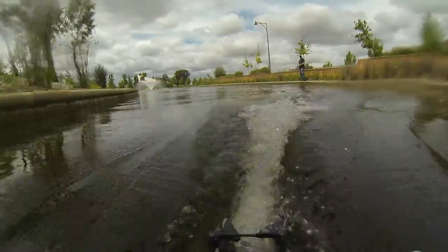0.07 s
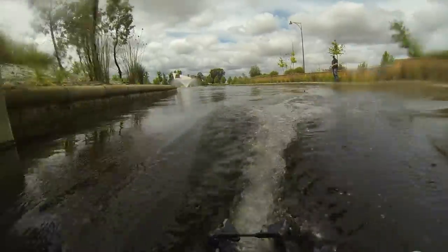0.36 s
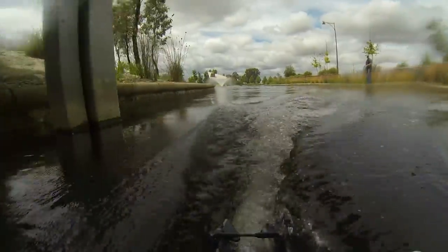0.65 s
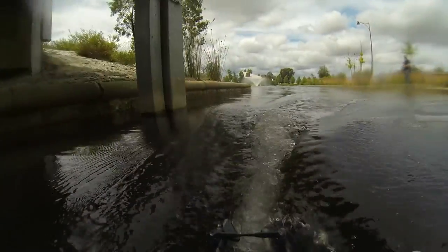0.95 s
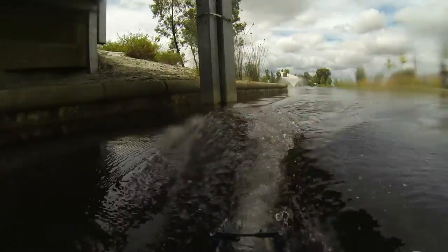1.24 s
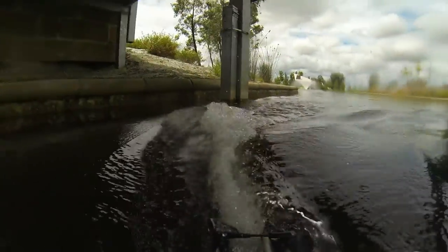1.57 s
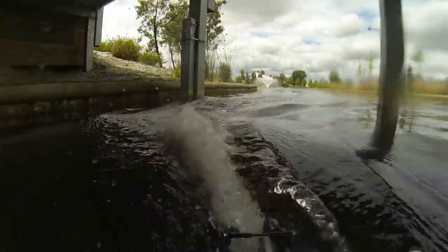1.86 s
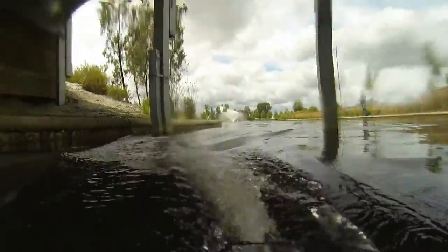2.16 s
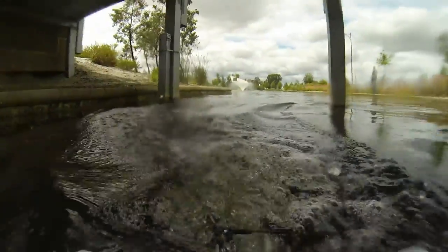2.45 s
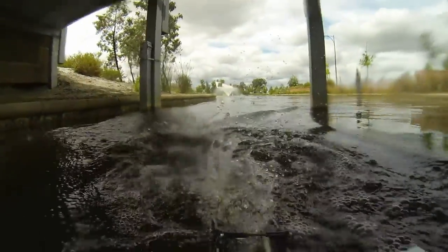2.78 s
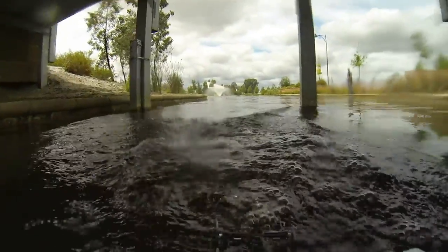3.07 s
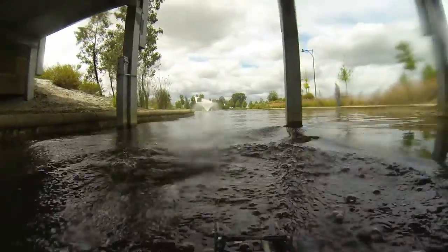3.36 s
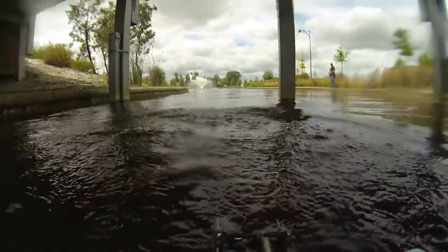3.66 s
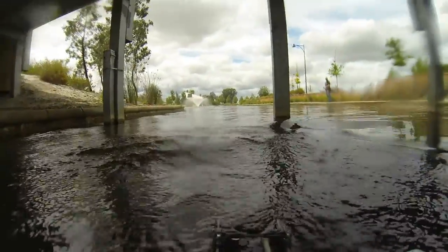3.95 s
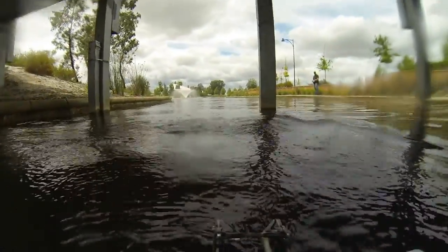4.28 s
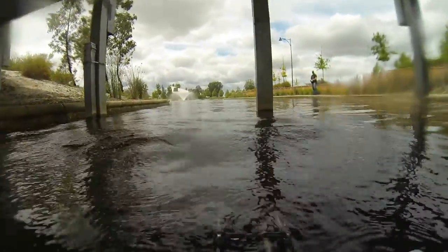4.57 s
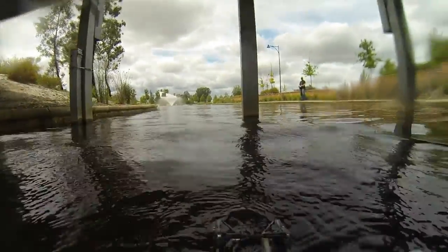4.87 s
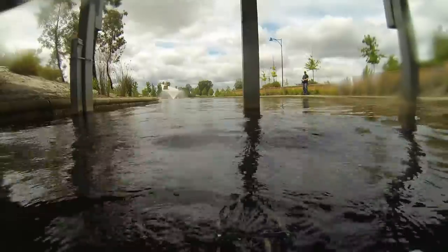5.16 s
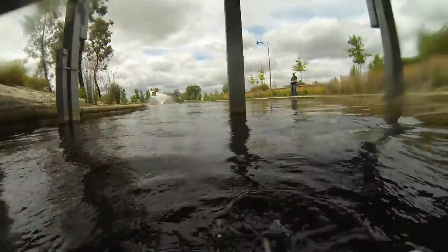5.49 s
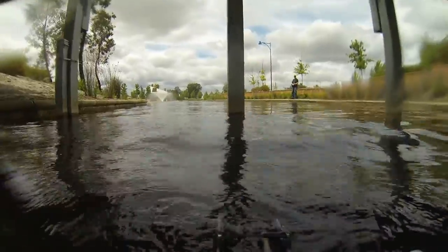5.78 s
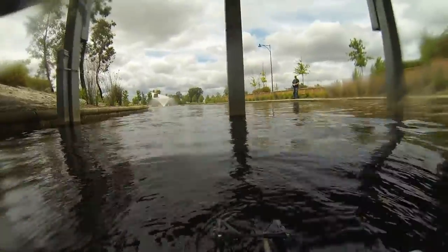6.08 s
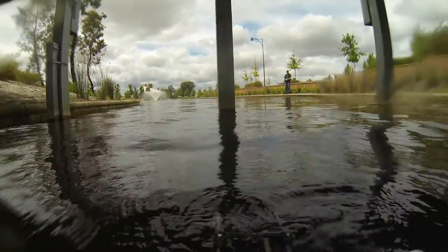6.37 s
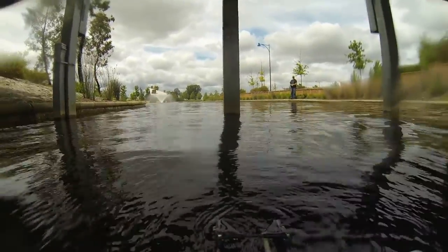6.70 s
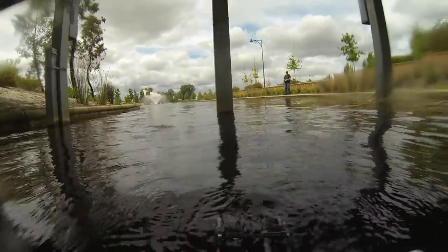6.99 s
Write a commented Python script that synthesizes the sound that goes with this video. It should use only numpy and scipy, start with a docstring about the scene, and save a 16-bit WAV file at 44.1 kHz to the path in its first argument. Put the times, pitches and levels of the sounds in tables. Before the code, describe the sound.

From the start, a model boat's electric motor buzzes loudly at full throttle, right by a microphone on deck. The low drone wavers slightly, carrying a whine, a thin high whistle and boxy, churning water. At about 2.1 seconds the motor cuts off with a sharp thump and a low rumble. From 2.3 to 2.9 seconds it gives one weaker burst and runs down, while the foaming wake sloshes against the stern with a light patter of spray. The foam thins into faint fizzing after 3 seconds. A dull knock bumps the hull at 3.4 seconds, with a softer one just after. The rest is much quieter: the boat drifts under a soft wash of outdoor air while scattered drops tap the deck. A brighter drip and slap come around 4.4 seconds, and small hollow laps follow near 5.8, 6.5 and 7.1 seconds.

```python
"""A model boat's buzz at full throttle, right at the microphone of a camera housed on its deck.
The propeller shakes the hull and churns the water while the speed controller whistles.
The motor brakes with a jolt and gives one short weak burst; the wake falls back and bumps the
hull. Then the boat drifts: ripples lap just below the microphone, and drops land on deck and
housing over a soft wash of air and distant water."""
import sys
import numpy as np
from scipy import signal
from scipy.fft import rfft, irfft
from scipy.io import wavfile
from scipy.ndimage import uniform_filter1d

SR = 44100
rng = np.random.default_rng(int(sys.argv[2]) if len(sys.argv) > 2 else 0)


def wav_out(sig):
    """Save sig, one row per channel (or a flat mono array), as 16-bit PCM at SR to the path in sys.argv[1]."""
    wavfile.write(sys.argv[1], SR, np.round(np.clip(np.atleast_2d(sig).T, -1, 1) * 32767).astype(np.int16))


N = 314609
TIME = np.arange(N) / SR
CUT_S, BRAKE_S = 2.132, 0.029  # when the power goes off; how long the propeller takes to stop


def amp(db):
    return 10 ** (np.asarray(db) / 20)


def unit(x):
    return x / np.sqrt(np.mean(x ** 2) + 1e-30)


def curve(rows):
    """The columns of a table as lines through time."""
    s, *columns = np.transpose(rows)
    return [np.interp(TIME, s, c) for c in columns]


def ramp(start_s, length_s):
    return np.clip((TIME - start_s) / length_s, 0, 1)


def fall_db(start_s, db_per_s):
    return np.clip((TIME - start_s) * db_per_s, 0, 150)


def add(mix, s, sound):
    part = mix[max(round(s * SR), 0):][:len(sound)]
    part += sound[:len(part)]


def band(x, lo_hz, hi_hz, order=2):
    return signal.sosfilt(signal.butter(order, [lo_hz, hi_hz], "band", fs=SR, output="sos"), x)


def wander(rate_hz):
    """Random drift of unit size, mostly slower than rate_hz."""
    rolloff = 1 + (np.fft.rfftfreq(N, 1 / SR) / rate_hz) ** 4
    return unit(irfft(rfft(rng.standard_normal(N)) / rolloff, N))


def response(colour, modes=()):
    """Causal impulse response of a smooth spectrum shaped by resonances."""
    hz = abs(np.fft.fftfreq(8192, 1 / SR))
    f, level = np.transpose(colour)
    db = np.interp(np.log(hz + 1), np.log(f), level)
    for centre, width, lift in modes:
        db = db + lift * .5 ** ((2 * (hz - centre) / width) ** 2)
    minimum_phase = np.exp(np.conj(signal.hilbert(np.log(amp(db)))))
    return np.fft.ifft(minimum_phase).real[:len(hz) // 2]


def through(x, taps):
    return signal.oaconvolve(x, taps)[:len(x)]


def pops(per_s, spread_db):
    """Bursting bubbles: random clicks, a few much larger than the rest."""
    size = amp(spread_db * np.minimum(rng.exponential(1, N), 4))
    return unit(size * rng.choice([-1, 1], N) * (rng.random(N) < per_s / SR))


# Resonances of the hull and of the housing around the microphone: (f/Hz, width/Hz, lift/dB)
BODY_MODES = [(202.8, 13, 9.5), (249.8, 31.7, 9.5), (288, 37.6, 11), (554, 49, 2.5), (845, 90, 3.5),
              (1316, 294, 10.5), (1560, 100, 4.5), (1947, 96, 5), (2350, 450, 4), (3157, 272, 11.5),
              (3450, 310, 13), (3826, 170, 6.5), (4380, 130, -11), (4380, 170, 7), (4925, 350, 13),
              (5390, 490, 11.5), (5880, 360, 11.5), (6660, 290, 12.5), (10700, 1100, 6.5)]
# Shaft speed at full throttle: (t/s, f/Hz)
SHAFT_SPEED = [(0.0, 126.6), (0.09, 125.8), (0.53, 126.1), (0.72, 130.4), (1.29, 130.1), (1.39, 126),
               (1.81, 127.1), (2.06, 129.7), (2.13, 134.8)]
# Beat of the blades, carried up through the hull: (t/s, relative level/dB)
BLADE_BEAT = [(0, -14.5), (.08, -12.5), (.2, -16), (.32, -23), (.42, -14.5), (.49, -13), (.57, -20.5),
              (.66, -13.5), (.77, -20), (.9, -12.5), (1.22, -20.5), (1.32, -13), (1.45, -23.5), (1.65, -20),
              (1.77, -15), (1.96, -15.5), (2.05, -14), (2.13, -13)]
# Whine of the motor's poles: {multiple of the shaft speed: level/dB}
POLE_WHINE = {4: -43, 6: -43, 9: -42, 10: -37.5, 12: -37, 15: -46, 24: -51, 30: -58}
# Churned water heard from the deck, before the resonances: (f/Hz, relative level/dB)
CHURN_SPECTRUM = [(25, -22), (75, -21), (110, -10.5), (160, -1), (250, 2), (400, -5), (750, -4.5),
                  (1000, -8), (1750, -11), (2750, -22), (4300, -30.5), (6700, -52.5), (7800, -32.5),
                  (8300, -38.5), (9600, -52.5), (14500, -61.5)]
def motor():
    """Shaft unbalance, two blades beating, the motor's poles whining, and foam torn off once a turn."""
    shaft_hz = curve(SHAFT_SPEED)[0]
    turn = 2 * np.pi * np.cumsum(shaft_hz) / SR
    powered = 1 - ramp(CUT_S, 0.011)
    shaft_db = -23 + 0.85 * (shaft_hz - 127.4)  # shakes harder as it speeds up
    shaft = amp(shaft_db + 0.5 * wander(15)) * np.sin(turn)
    # the blades bite air and water by turns, so their beat staggers
    bite = amp(curve(BLADE_BEAT)[0] - 0.3) * (1 + .3 * wander(22))
    blades = bite * np.sin(2 * turn + 0.2 * wander(18))
    whine = sum(amp(db + 2 * wander(16)) * np.sin(order * turn + 0.45 * wander(8))
                for order, db in POLE_WHINE.items())
    foam = pops(5000, 3.4) + 0.5 * rng.standard_normal(N)
    foam = foam * (1 + 0.15 * np.cos(turn)) * amp(0.91 * wander(50))
    churn_db = -16.5 - 6 * (1 - powered) - fall_db(CUT_S + BRAKE_S, db_per_s=1898.5)
    churn = amp(churn_db) * unit(through(foam, response(CHURN_SPECTRUM, BODY_MODES)))
    return np.sqrt(2) * powered * (shaft + blades + whine) + churn


def whistle(switching_hz=8014):
    """The windings sing at the controller's switching rate, less evenly at part throttle."""
    reopened = amp(-2.5) * ramp(2.207, 0.19) + amp(-34.5)  # part throttle over a faint idle
    shut = ramp(2.555, 0.055)
    throttle = 1 - ramp(CUT_S, BRAKE_S) + reopened * (1 - shut)
    uneven = np.interp(TIME, [2.15, 2.25], [.08, .3])
    level = np.sqrt(2) * amp(-49.5) * throttle * (1 + uneven * wander(40))
    return level * np.sin(2 * np.pi * switching_hz * TIME + uneven * wander(30))


def standby(hz=13641):
    """The electronics on board keep up a thin, fluttering whine."""
    return np.sqrt(2) * amp(-100) * (1 + .5 * wander(25)) * np.sin(2 * np.pi * hz * TIME)


# Quiet air and distant water, from inside the housing: (f/Hz, relative level/dB)
AIR_SPECTRUM = [(20, 9.5), (60, -2), (160, -7.5), (260, -2.5), (350, -14), (600, -15), (1050, -21),
                (1330, -7.5), (1580, -10), (1900, -22), (3100, -21.5), (4000, -27), (8000, -34.5),
                (14500, -43)]
def air():
    """A soft, wavering outdoor wash reaches the microphone through the housing."""
    wash = unit(through(rng.standard_normal(N), response(AIR_SPECTRUM)))
    return wash * amp(-56 + 0.9 * wander(6))


# Water striking the boat close by, before the resonances: (f/Hz, relative level/dB)
SPLASH_SPECTRUM = [(60, -6), (220, -2.5), (400, -5), (600, -0.5), (1000, -5.5), (1750, -5), (2500, -10),
                   (3500, -10.5), (5500, -7.5), (7000, -31), (14000, -50.5)]
def trickle():
    """A faint trickle ticks in a narrow band near the housing's ring."""
    ticks = through(pops(70, 2.5), response(SPLASH_SPECTRUM, BODY_MODES))
    return amp(-72) * unit(band(ticks, 1150, 1300))


# Foam astern, heard from the deck, before the resonances: (f/Hz, relative level/dB)
FOAM_SPECTRUM = [(25, -7), (70, -6), (150, 11.5), (230, 2.5), (400, -4), (750, -6.5), (1000, -8.5),
                 (1750, -13), (2300, -16.5), (2800, -24.5), (4300, -34.5), (6700, -57), (8200, -36),
                 (9600, -58), (14500, -62)]
def froth(bubbles, bass_db, treble_db):
    """Bubbles heard through hull and housing, with more or less bass and treble."""
    foam = (bubbles + 0.32 * rng.standard_normal(N)) * amp(1.9 * wander(30))
    sound = unit(through(foam, response(FOAM_SPECTRUM, BODY_MODES)))
    low = signal.sosfiltfilt(signal.butter(2, 380, fs=SR, output="sos"), sound)
    high = signal.sosfiltfilt(signal.butter(2, 2200, "high", fs=SR, output="sos"), sound)
    return amp(bass_db) * low + (sound - low - high) + amp(treble_db) * high


# The wake falling back on the stern: (t/s, level/dB)
WAKE_LEVEL = [(2.17, -34.5), (2.28, -34), (2.325, -24), (2.44, -27), (2.57, -21.5), (2.68, -26.5),
              (2.79, -35), (2.93, -37), (2.99, -46.5), (3.12, -63)]
def wake():
    """Foam collapses against the stern, turns dull and thins out into single bubbles."""
    flowing = ramp(CUT_S, BRAKE_S) * amp(curve(WAKE_LEVEL)[0] - fall_db(WAKE_LEVEL[-1][0], 100))
    foam = froth(pops(4500, 2.3), bass_db=-5.5, treble_db=-0.5 - fall_db(2.735, db_per_s=65))
    fizzing = ramp(2.91, 0.32) * amp(-56 - fall_db(3.74, db_per_s=42))
    small_bubbles = amp(-17) * unit(band(pops(260, 2.6), 2600, 3150))
    fizz = froth(pops(450, 4.6), bass_db=.5, treble_db=5) + small_bubbles
    return flowing * foam + fizzing * fizz


# Rumble of the stern wave under the microphone: (t/s, level/dB)
HEAVE_LEVEL = [(2.14, -68), (2.17, -25.5), (2.4, -37.5), (3.1, -54), (3.34, -49), (3.6, -49), (4.2, -70)]
def heave():
    """The stern wave catches up and heaves the boat."""
    return amp(curve(HEAVE_LEVEL)[0]) * unit(band(rng.standard_normal(N), 15, 52, order=3))


# Blows reaching the microphone through its mount, each level a gain on its own part:
# (t/s, push level/dB, push f/Hz, push decay/s, rattle level/dB, sway level/dB, boom level/dB)
MOUNT_BLOWS = [(2.151, 3, 165, 0.0016, -16, -30, -30), (2.282, -16.5, 60.5, .005, -50, -26.5, -24),
               (3.364, -12, 71.4, 0.0055, -37, -25, -50), (3.541, -32, 68, 0.017, -38.5, -40.5, -43.5)]
def knocks(swell_s=0.048):
    """A blow pushes the mount, rattles the housing, sets the hull booming and the camera swaying."""
    out, taps, t = np.zeros(N), response(CHURN_SPECTRUM, BODY_MODES), TIME[:SR * 3 // 2]
    for s, db, hz, decay, rattle_db, sway_db, boom_db in MOUNT_BLOWS:
        push = -np.sin(2 * np.pi * hz * t) * t / decay * np.exp(1 - t / decay)
        flex = -np.sin(2 * np.pi * 36 * t) * np.exp(-t / 0.068) * (1 - np.exp(-t / .004))
        shake = rng.standard_normal(len(t)) * np.exp(-t / 0.0046)
        rattle = 2 * band(through(shake, taps), 120, 3600) / np.linalg.norm(taps)
        sway = -np.sin(2 * np.pi * 10 * t) * np.exp(-t / 0.36)
        swell = (t / swell_s * np.exp(1 - t / swell_s)) ** 2
        boom = swell * unit(band(through(rng.standard_normal(len(t)), taps), 90, 330))
        impact = amp(db) * push + amp(rattle_db) * rattle
        add(out, s, impact + amp(sway_db) * (sway + flex) + amp(boom_db) * boom)
    return out


def splash(parts, length_s, taps, rise, ring_s, ring_share):
    """Spray comes first; as the water spreads the sound sinks to a slosh and a boom of the hull."""
    out, t = 0, TIME[:SR // 4]
    for lo_hz, hi_hz, db, stretch in parts:
        age = t / (length_s * stretch)
        ring = ring_share * np.exp(-t / (ring_s * stretch))
        push = (1 - np.exp(-age / rise)) * (np.exp(-1.4 * age) + ring)
        sound = band(through(push * rng.choice([-1, 1], len(t)), taps), lo_hz, hi_hz, order=3)
        loudest_rms = np.sqrt(uniform_filter1d(sound ** 2, size=265).max())
        out = out + amp(db) * sound / loudest_rms
    return out


def tilted(db, tilt, hz):
    """Level of a slap at a given frequency; the tilt turns about the housing's ring."""
    return db + tilt * np.log2(hz / 1410)


# Hull boom, slosh and housing ring of a slap: (low f/Hz, high f/Hz, relative level/dB, time stretch)
SLAP_BANDS = [(163, 282, 0, 2.6), (376, 910, -4, 2), (1230, 1640, -3, 1.25)]
# Ripples on the hull, just below the microphone:
# (t/s, level/dB, tilt/dB per octave, base length/s, spray f/Hz)
RIPPLES = [(2.236, -37.5, -2, 0.0015, 2700), (2.405, -28.5, -1, 0.0012, 2670),
           (3.367, -38, -4.5, 0.0069, 2400), (3.537, -42, -3.5, 0.0096, 2420), (4.47, -32, 1, 0.0041, 2550),
           (5.163, -51, -6.5, 0.0072, 2800), (5.575, -50.5, -3, 0.0027, 2800),
           (5.817, -54, -3.5, 0.0056, 2700), (5.835, -40.5, 1, 0.0094, 2600),
           (5.891, -57, -7, 0.0093, 3000), (6.208, -58.5, -3.5, 0.0016, 3410),
           (6.439, -47.5, -2, .008, 2490), (6.458, -49, -1, 0.033, 2550), (6.523, -42.5, -2, 0.0078, 2230),
           (6.635, -42, -1.7, .007, 2210), (7.104, -41.5, -0.5, 0.0023, 2130)]
def laps():
    """A flat slap is bright; a ripple that rolls under the hull is mostly boom."""
    out, taps = np.zeros(N), response(SPLASH_SPECTRUM, BODY_MODES)
    for s, db, tilt, length_s, spray_hz in RIPPLES:
        spray_band = (.8 * spray_hz, 1.114 * spray_hz, -6.5, 1)
        parts = [(lo, hi, tilted(db + part_db, tilt, np.sqrt(lo * hi)), stretch)
                 for lo, hi, part_db, stretch in [*SLAP_BANDS, spray_band]]
        add(out, s, splash(parts, length_s, taps, rise=0.55, ring_s=0.021, ring_share=0.03))
    return out


def rocking():
    """The hull rocks with a short rumble after each ripple."""
    level, t = np.zeros(N), TIME[:SR // 2]
    settling = np.exp(-t / 0.071) * (1 - np.exp(-t / 0.0028))
    for s, db, tilt, *_ in RIPPLES:
        add(level, s, amp(tilted(db, tilt, hz=200) - 11.5) * settling)
    return level * unit(band(rng.standard_normal(N), 25, 172))


# The shaft's short run after braking: (t/s, shaft f/Hz, level/dB)
BURST_RUN = [(2.28, 129.9, -29.5), (2.34, 106.4, -32), (2.45, 97.5, -38.5), (2.52, 116.8, -30.5),
             (2.58, 117.6, -25), (2.66, 88, -46), (2.73, 66.3, -33), (2.8, 51.5, -47), (2.88, 45.4, -59)]
def weak_burst(hull_hz=238):
    """The shaft turns again and runs down; the blade beat swells as it crosses the hull resonance."""
    shaft_hz, db = curve(BURST_RUN)
    turn = 2 * np.pi * np.cumsum(shaft_hz * (1 + 0.0079 * wander(31))) / SR
    blade_db = -6 + 12 / (1 + ((2 * shaft_hz - hull_hz) / 25) ** 2)
    turning = np.clip(np.minimum(TIME - BURST_RUN[0][0], BURST_RUN[-1][0] - TIME) / .015, 0, 1)
    return turning * amp(db + 2 * wander(25)) * (np.sin(turn) + amp(blade_db) * np.sin(2 * turn))


def spray():
    """Flung drops patter on the housing, right at the microphone, as the wake collapses."""
    patter_db = np.interp(TIME, [2.3, 2.5, 2.74, 2.85], [-76, -64, -65, -98], left=-160, right=-160)
    drops = through(pops(700, 4.5), response(SPLASH_SPECTRUM, BODY_MODES))
    return amp(patter_db) * unit(band(drops, 8000, 13000, order=3))


# Drops on deck and housing, very close:
# (t/s, boom level/dB, ring level/dB, spray level/dB, top of the spray f/Hz)
DECK_DROPS = [(2.993, -44.5, -43.5, -57, 3200), (3.041, -48, -51, -55.5, 3780),
              (3.155, -52, -44.5, -72, 3000), (3.179, -59, -52, -64, 3200), (3.232, -57, -52, -58, 3200),
              (3.312, -51, -48.5, -64, 3200), (3.43, -43, -42.5, -63, 2700), (3.706, -52, -37.5, -60, 3050),
              (3.733, -48, -54, -47.5, 3030), (3.783, -53, -50.5, -65, 3300), (3.839, -60, -50, -64, 3300),
              (4.338, -43, -36, -43.5, 5200), (4.452, -53, -42, -46, 3300), (4.89, -50, -50, -65, 3300),
              (4.927, -51.5, -52, -68, 3600), (4.963, -50.5, -47.5, -63, 3050),
              (4.975, -51, -53, -71, 3100), (5.067, -55, -50, -67, 3000), (5.611, -65, -64, -57, 9000),
              (6.306, -50.5, -60, -58, 3200), (6.359, -52, -57, -57, 3050), (6.472, -51, -58, -60, 5170),
              (6.499, -41, -44.5, -53, 4430), (7.086, -49, -38.5, -65, 3050),
              (7.093, -47, -38.5, -68, 2650)]
def drips():
    """Each drop is a tiny splash: a tick of spray, a ring of the housing, a slosh and a small boom."""
    out, taps = np.zeros(N), response(SPLASH_SPECTRUM, BODY_MODES)
    for s, db, ring_db, spray_db, top_hz in DECK_DROPS:
        boom, slosh = (158, 274, db, 2.9), (390, 1400, db - 5, 2.9)
        ring, tick = (1230, 1710, ring_db, 0.71), (2260, top_hz, spray_db, 0.54)
        parts = [boom, slosh, ring, tick]
        add(out, s, splash(parts, 0.0036, taps, rise=0.13, ring_s=0.01, ring_share=0.16))
    return out


def scene():
    """The drive, the water and the moving hull, all at one microphone on deck."""
    drive = motor() + weak_burst() + whistle() + standby()
    water = wake() + spray() + laps() + drips()
    return (drive + water + knocks() + air() + trickle() + rocking() + heave())[None]


def record(dry):
    """The camera rounds off peaks near full scale and cuts the highest treble."""
    rounded = dry / (1 + abs(dry / .99) ** 8) ** (1 / 8)
    lowpass = signal.firwin(511, 14900, window=("kaiser", 9), fs=SR)
    return signal.oaconvolve(rounded, lowpass[None], "same")


dry = scene()
out = record(dry)
wav_out(out)
```